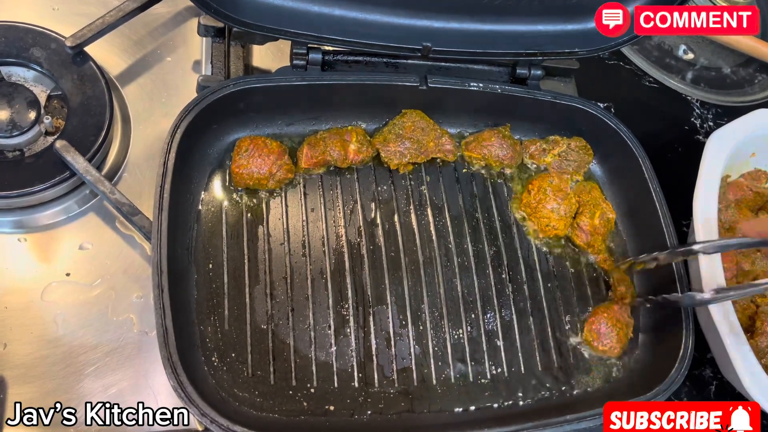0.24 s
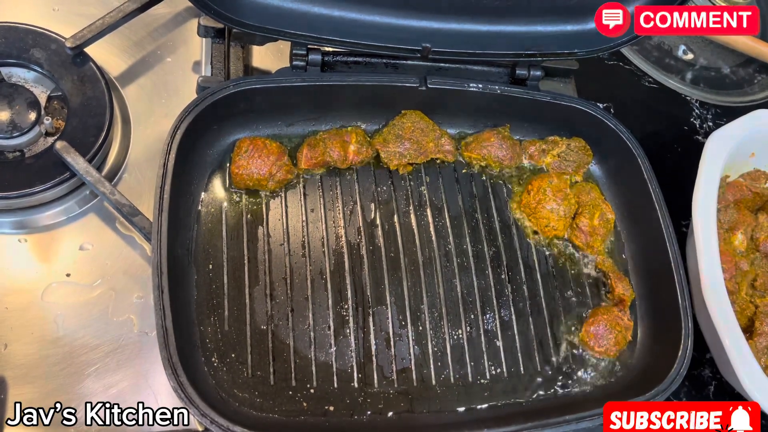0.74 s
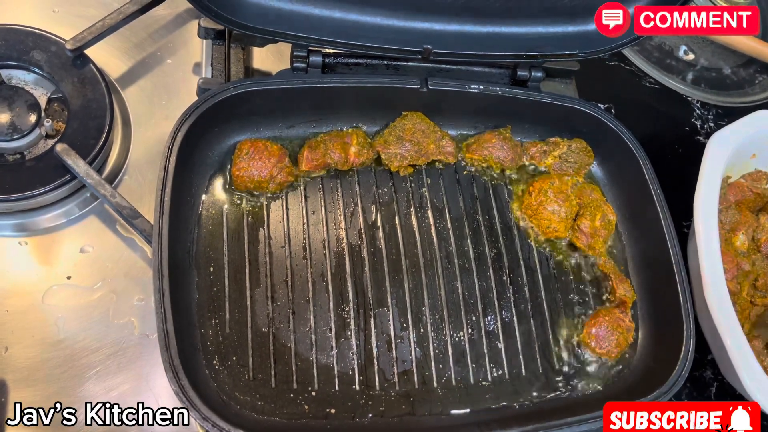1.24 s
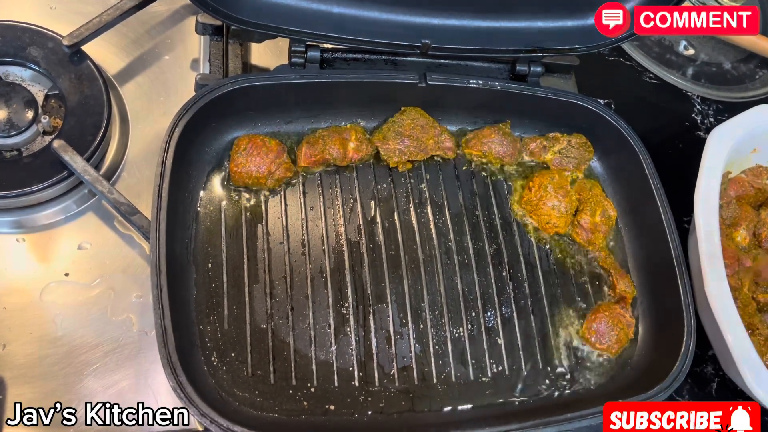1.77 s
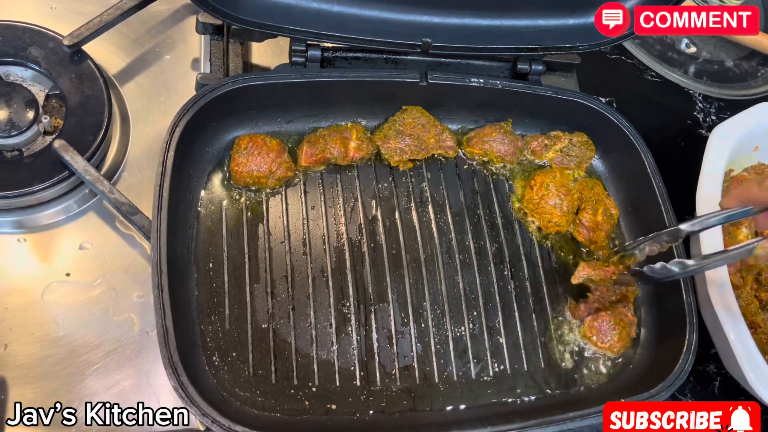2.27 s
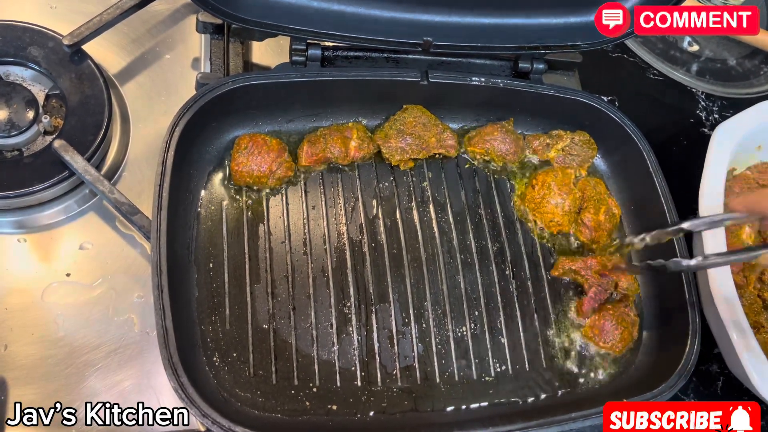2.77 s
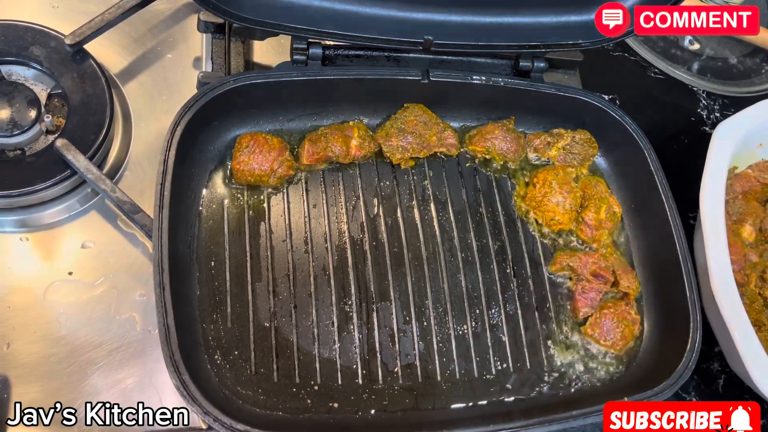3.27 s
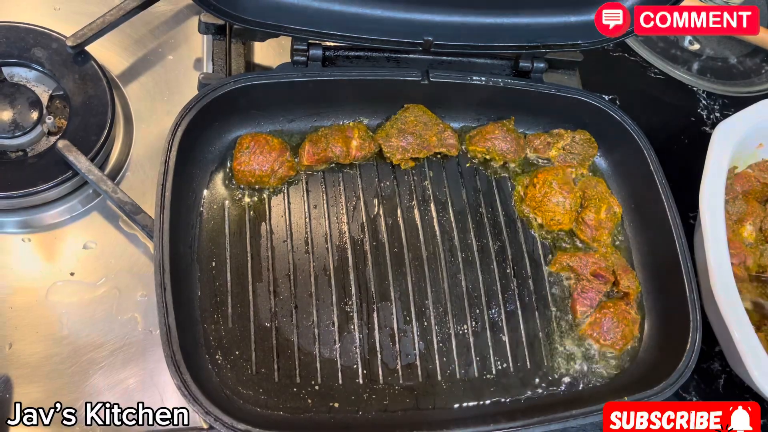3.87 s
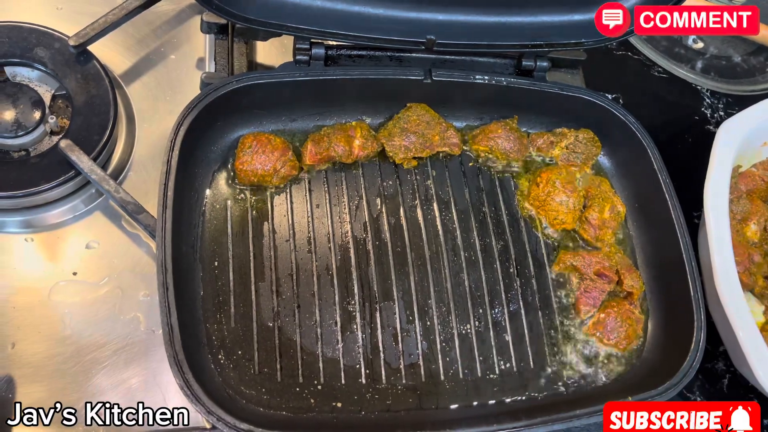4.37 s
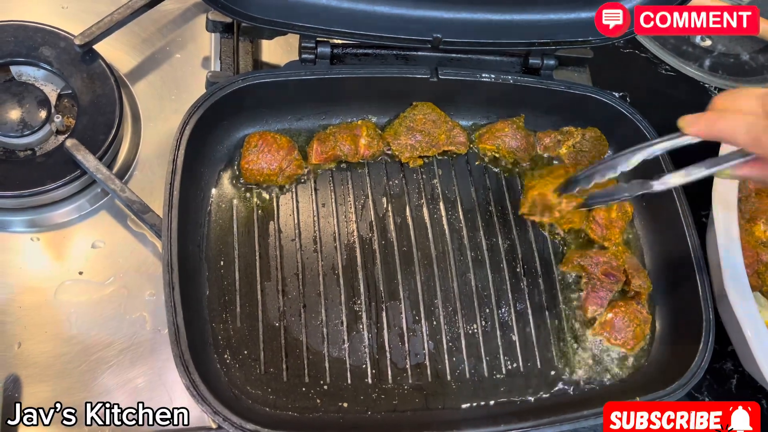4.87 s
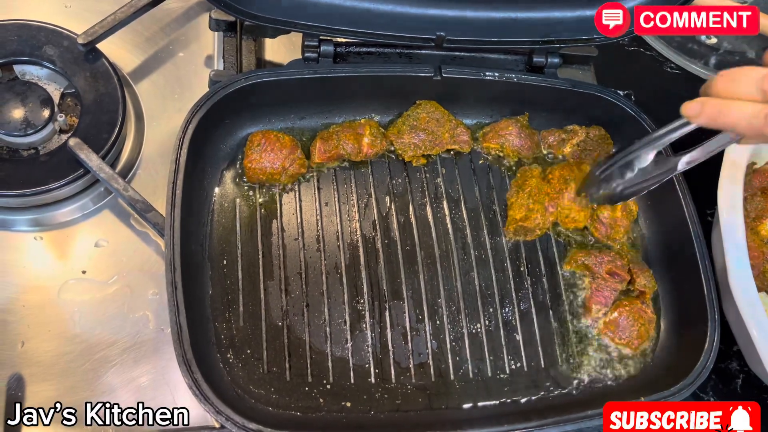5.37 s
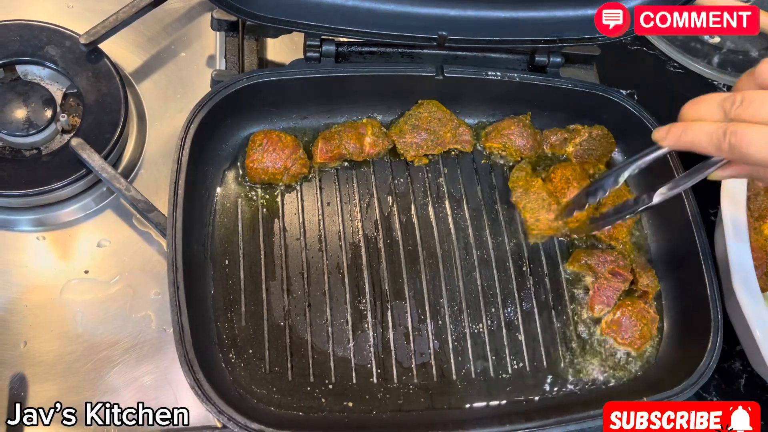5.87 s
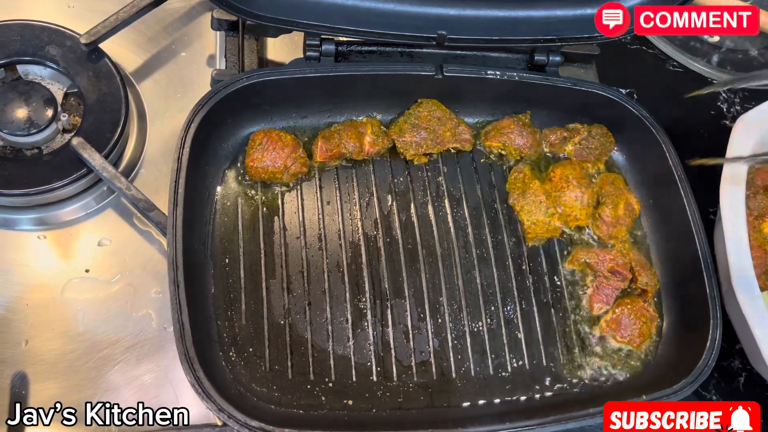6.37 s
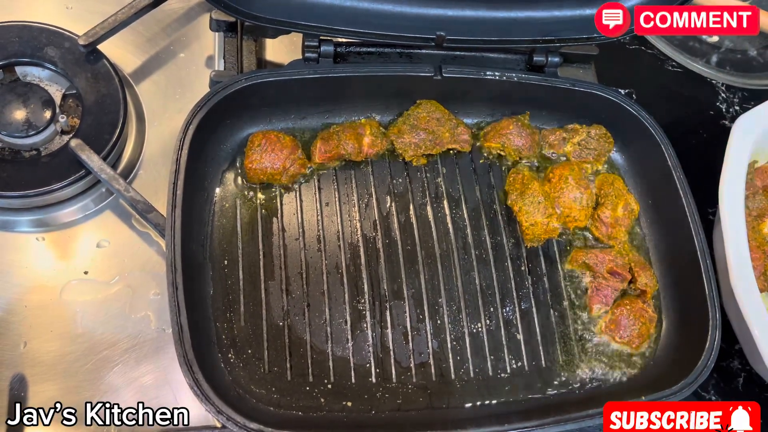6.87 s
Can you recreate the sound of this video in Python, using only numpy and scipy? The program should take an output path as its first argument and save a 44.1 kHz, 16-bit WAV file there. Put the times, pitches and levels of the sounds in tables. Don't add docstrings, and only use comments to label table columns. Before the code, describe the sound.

Meat pieces fry steadily in a ridged metal pan, fizzing and spitting sharply, with an early tong knock, faint squeaks and later scrapes.

```python
import sys
import numpy as np
from scipy import signal
from scipy.fft import rfft, irfft, next_fast_len
from scipy.io import wavfile
from scipy.ndimage import map_coordinates

SR = 44100
rng = np.random.default_rng(int(sys.argv[2]) if len(sys.argv) > 2 else 0)


def bounce(signal):
    frames = np.transpose(np.atleast_2d(signal))
    limited = np.clip(frames, -1, 1)
    pcm = np.round(limited * 32767).astype(np.int16)
    wavfile.write(sys.argv[1], SR, pcm)


def undo_db(level):
    steps = np.asarray(level, float) / 20
    return 10 ** steps


N = 314433


def unit(x):
    return x / np.sqrt(np.mean(x ** 2, axis=-1, keepdims=True) + 1e-20)


def along(points, hz):
    f, value = np.transpose(points)
    return np.interp(np.log(hz + 1), np.log(f + 1), value)


def wobble(rate):
    knots = rng.standard_normal(int(N * rate / SR) + 4)
    return map_coordinates(knots, [np.arange(N) * rate / SR])


def filtered(x, response):
    m = next_fast_len(N + 8192)
    return irfft(rfft(x, m) * response(np.fft.rfftfreq(m, 1 / SR)), m)[..., :N]


def bubbles(s, size, hz, life, rise, count=96):
    t = np.arange(count) / SR
    age = t / life[:, None]
    envelope = size[:, None] * age * np.exp(1 - age)
    wave = envelope * np.sin(2 * np.pi * hz[:, None] * t * (1 + rise * age))
    start = np.round(s * SR).astype(int)[:, None]
    at = np.clip(start + np.arange(count), 0, N)
    return np.bincount(at.ravel(), wave.ravel(), N + 1)[:N]


def ports(near, far):
    # f/Hz, likeness/0-1
    alike = [(200, .95), (800, .65), (1250, .2), (3000, .3), (6000, .32), (8200, .5), (9000, .85),
             (9800, .97), (10600, .97), (11000, .9), (11750, .9), (11950, .995), (12400, .97), (12900, .25),
             (14400, .05), (14800, .97)]
    # f/Hz, phase/rad
    lead = [(200, -.15), (1200, -1.2), (2750, -2.8), (3800, -5.9), (4800, -7.6), (5900, -12.5),
            (7200, -14.0), (8400, -12.3), (9750, -9.7), (10550, -9.15), (11600, -6.9), (11950, -6.283),
            (16000, -6.283)]
    # f/Hz, level/dB
    tilt = [(100, 3), (400, 1.5), (950, 3.5), (1700, 3), (2300, 0), (4000, 0.9), (5500, 1.5), (7000, 5.5),
            (8200, -0.4), (16000, 2)]
    side = np.array([[-.5], [.5]])
    like = lambda f: np.clip(along(alike, f), 0, 1)
    lean = lambda f: undo_db(-side * along(tilt, f))
    phase = lambda f: np.exp(1j * side * along(lead, f))
    direct = filtered(near, lambda f: lean(f) * np.sqrt(like(f)) * phase(f))
    return direct + filtered(far, lambda f: lean(f) * np.sqrt(1 - like(f)))


def kitchen():
    # f/Hz, level/dB
    rumble = [(28, -22), (45, -15), (75, 2), (110, -2.5), (160, -2), (220, -19.5), (400, -10.5),
              (700, -2.5), (1300, -74)]
    # f/Hz, rms level/dB
    mains = [(50, -58.5), (100, -70.5)]
    t = np.arange(N) / SR
    hum = np.zeros(N)
    for hz, db in mains:
        hum += np.sqrt(2) * undo_db(db + 1.4 * wobble(5.07)) * np.sin(2 * np.pi * hz * t)
    noise = rng.standard_normal((2, N))
    mid, side = unit(filtered(noise, lambda f: undo_db(along(rumble, f))))
    return hum + undo_db(-58.5) * (mid + undo_db(-9.5) * np.array([side, -side]))


def slips():
    # t/s, length/s, start f/Hz, end f/Hz, level/dB
    squeaks = [
        (2.875, .11, 790, 960, -48),
        (3.572, 0.074, 790, 894, -53),
    ]
    out, rough = np.zeros(N), undo_db(6.4 * wobble(120))
    for s, length, from_hz, to_hz, db in squeaks:
        u = np.clip((np.arange(N) / SR - s) / length, 0, 1)
        hz = from_hz + (to_hz - from_hz) * u + 25 * wobble(90)
        turn = 2 * np.pi * np.cumsum(hz) / SR
        out += undo_db(db) * np.sin(np.pi * u) * rough * (np.sin(turn) + 1.3 * np.sin(2 * turn))
    return out * undo_db([[1.2], [-1.2]])


def rubbing(hz):
    # t/s, length/s, level over the singing/dB
    rubs = [
        (2.55, .15, 5),
        (5.044, .5, 6.5),
        (5.624, 0.21, 11),
        (6.09, 0.13, 12),
    ]
    edge_s, centre_hz, reach_octaves = 0.047, 670, 0.5
    now = np.arange(N) / SR
    strokes = np.zeros(N)
    for s, length, db in rubs:
        strokes += db * np.clip(np.minimum(now - s, s + length - now) / edge_s, 0, 1)
    return strokes * np.exp(-(np.log2(hz / centre_hz) / reach_octaves) ** 2)


def pan():
    # t/s, peak level/dB
    knocks = [
        (0.16, -17),
        (2.692, -47),
        (5.693, -54),
        (6.141, -47),
    ]
    # f/Hz, knock level/dB, t60/s, singing level/dB, left-right level/dB
    modes = [(257, 1, 0.062, -70.5, 0), (342.1, -7, 0.26, -61, 1), (457, -24, 0.35, -65, 1),
             (684, -7.5, 0.1, -62.5, -1), (743, -20, 0.35, -82, 13), (960, 1, 0.093, -57.5, 11),
             (1162, -15, 0.055, -68.5, -18), (1412, -16, 0.1, -55.5, 2), (1504, -14, 0.093, -71, 0),
             (1765, -26, 0.036, -53.5, 2), (1964, -24, 0.18, -55, -2.5)]
    out, t = np.zeros((2, N + SR)), np.arange(SR // 2) / SR
    song = np.zeros((3, N))
    for hz, level_db, t60, sing_db, lean_db in modes:
        for s, db in knocks:
            envelope = undo_db(db + level_db - 60 * t / t60) * (1 - np.exp(-t * hz / 6.4))
            ring = envelope * np.sin(2 * np.pi * (hz * t + rng.random()))
            out[:, round(s * SR):][:, :len(t)] += ring * undo_db([[lean_db / 2], [-lean_db / 2]])
        wide = 1.0 / t60 + 0.025 * hz
        mode = lambda f: 1j * f * wide / (hz * hz - f * f + 1j * f * wide)
        song += undo_db(sing_db + rubbing(hz)) * unit(filtered(rng.standard_normal((3, N)), mode))
    thud_band = signal.butter(2, [160, 900], 'band', fs=SR, output='sos')
    for s, db in knocks:
        thud = signal.sosfilt(thud_band, rng.standard_normal((2, len(t))))
        envelope = undo_db(db + 2.5 - 60 * t / 0.21) * (1 - np.exp(-t / 0.017))
        out[:, round(s * SR):][:, :len(t)] += envelope * thud
    song *= undo_db(1.6 * wobble(6))
    return out[:, :N] + ports(song[0], song[1:])


def lesser(rule, count):
    mean, spread = np.reshape(rule, (-1, 2)).T
    s = rng.random(count) * N / SR
    return np.column_stack([s, mean + spread * rng.standard_normal((count, len(mean)))])


def spits():
    # t/s, peak level/dB, duller part level/dB
    clear_spits = [(0.2204, -20, -10), (0.375, -18, -15), (0.4344, -18, -15), (1.1573, -17, -17),
                   (1.5938, -17, -14), (1.6666, -16, -20), (1.8253, -17, -15), (1.925, -16, -14),
                   (2.2144, -12, -16), (2.2877, -18, -13), (2.4344, -16, -15), (2.7112, -17, -14),
                   (3.0235, -17, -13), (3.272, -16, -7), (3.3513, -17, -11), (3.5089, -13, -17),
                   (3.5907, -12, -18), (3.6955, -13, -20), (4.149, -13, -20), (4.5346, -18, -15),
                   (4.797, -15, -15), (5.44, -13, -16), (5.463, -16, -14), (6.0472, -16, -15),
                   (6.3041, -16, -14), (6.4522, -17, -13), (6.6074, -15, -17), (6.7092, -14, -11),
                   (6.8833, -17, -12), (7.0868, -11, -17)]
    # level/dB, spread/dB, duller part level/dB, spread/dB
    chance_spits = (-19, 1.5, -10, 3)
    s, db, dull_db = np.vstack([clear_spits, lesser(chance_spits, count=70)]).T
    u = rng.random((len(s), 2))
    bright_life, dull_life = .0002 + .0001 * u[:, 1], .00012 + .0001 * u[:, 0]
    crack = bubbles(s + .0004, undo_db(db + 2.4), 10900 + 800 * u[:, 0], bright_life, rise=.005)
    crack += bubbles(s + 0.00062, undo_db(db + dull_db + 9), 6000 + 2000 * u[:, 1], dull_life, rise=.01)
    return ports(crack, np.zeros((2, N)))


def pops():
    # t/s, peak level/dB, f/Hz, left-right level/dB
    clear_pops = [(0.2214, -23, 5760, 0), (0.277, -19.5, 4400, 0), (0.3657, -17.5, 4040, 8),
                  (0.7876, -23, 5260, 4), (0.8485, -20, 4520, 0), (0.8919, -19.5, 5200, 2.5),
                  (0.9534, -18.5, 5900, 3.5), (1.0066, -29, 5640, 7), (1.3349, -21, 6800, 9),
                  (1.3943, -23, 5780, 5), (1.4704, -18, 4700, 2.5), (1.517, -18, 4670, 4),
                  (2.5067, -22.5, 4690, 2.5), (2.5895, -21, 5100, 7), (2.832, -24.5, 5600, 11),
                  (3.0048, -13, 5230, 4), (3.3109, -16.5, 5900, 2.5), (3.3571, -18, 4240, -1),
                  (3.5004, -20.5, 5430, 3), (3.7853, -15, 5300, 2), (3.819, -20, 5400, 2.5),
                  (3.931, -21, 5700, 0), (4.5104, -17, 4300, 3.5), (4.7875, -16.5, 5600, 4),
                  (5.8316, -21, 5100, 5), (6.3869, -22, 6120, 2), (6.7356, -18, 5400, 6.5),
                  (6.8253, -18, 4940, 3), (7.0497, -21.5, 5600, -3), (7.086, -22, 7500, 5)]
    # level/dB, spread/dB, f/Hz, spread/Hz, left-right level/dB, spread/dB
    chance_pops = (-26.5, 1.5, 5700, 600, 2.5, 2.5)
    s, db, hz, pan_db = np.vstack([clear_pops, lesser(chance_pops, count=40)]).T
    life = 0.00068 * np.ones(len(s))
    ears = []
    for side in (.5, -.5):
        u = rng.random((len(s), 3))
        size = undo_db(db - 1 + side * pan_db)
        first = bubbles(s + 0.00037 + .00003 * u[:, 0], size, hz, life, rise=0.014, count=200)
        echo_s, echo_hz = s + .002 + .004 * u[:, 1], hz * (.93 + .14 * u[:, 2])
        echo = bubbles(echo_s, undo_db(-5) * size, echo_hz, 1.6 * life, rise=.01, count=200)
        ears.append(first + echo)
    return np.array(ears)


def by_size(size):
    sizes = (0, .5, 1)
    return np.exp(-((np.array(sizes)[:, None] - size) / 0.32) ** 2)


def boiling():
    # t/s, level/dB
    simmer = [(0, -1), (.08, -0.5), (.7, 1), (.9, .5), (1.2, -0.5), (1.5, .5), (1.68, -0.5), (1.8, 0),
              (2.22, -1), (2.5, 1), (3.3, -0.5), (3.65, 0.5), (3.8, 1.5), (4.02, 0.5), (4.5, 0), (5.6, 2),
              (6.8, -0.5), (7.13, 0.5)]
    follow = (0.18, .99, 0.77)
    # t/s, flare level/dB, share in small bubbles/0-1
    laid = [
        (.17, 1.5, .4),
        (2.62, 1, 0),
        (2.84, 3.5, .1),
        (5.045, 4.5, 0.8),
        (5.17, 5, 0.53),
    ]
    flare_fall_s = (.2, 0.16, 0.85)
    # t/s, level/dB, bubble size/0 large-1 small
    flurries = [(.28, 5.5, 0.35), (.34, -0.5, .1), (.4, -6, .95), (.71, -6, 0.75), (1.45, 5, 0.75),
                (2.22, 4.5, 0.87), (2.25, -8, 0.78), (2.3, 4, .95), (2.7, 5.5, .05), (2.72, 1, 0.93),
                (2.98, -4, 0.45), (3.02, 5, .3), (3.06, -4, 0.39), (3.14, 4, 0.67), (3.26, 4.5, 0.41),
                (3.29, 4, .95), (3.33, -1.5, .95), (3.37, 4.5, 0.26), (3.45, -4, 0.78), (3.5, 3.5, 0.67),
                (3.99, 4, .95), (4.01, -7, 0.84), (4.47, 3.5, 0.82), (4.51, -1, .95), (5.08, 1, 1),
                (6.39, 3, 0.24), (6.62, 1, 1)]
    rise_s, hold_s, flurry_s = 0.045, 0.089, 0.022
    t = np.arange(N) / SR
    db = np.outer(follow, np.interp(t, *np.transpose(simmer)))
    for s, flare_db, small in laid:
        rise = 1 - np.exp(-np.clip(t - s, 0, None) / rise_s)
        fall = np.exp(-np.clip(t - s - hold_s, 0, None) / np.array(flare_fall_s)[:, None])
        db += flare_db * np.array([[1 - small], [.65], [small]]) * rise * fall
    for s, gush_db, size in flurries:
        db += gush_db * by_size(size) * np.exp(-((t - s) / flurry_s) ** 2)
    return undo_db(db)


def spray(surge, lo_hz, hi_hz, life, spread_db, hiss, count):
    chance = np.cumsum(surge ** 2)
    streams = []
    for _ in range(3):
        u = rng.random((count, 4))
        s = np.interp(u[:, 0], chance / chance[-1], np.arange(N) / SR)
        size = undo_db(-spread_db * np.log(u[:, 1] + 1 / 300)) * np.sign(u[:, 3] - .5)
        hz = lo_hz + (hi_hz - lo_hz) * u[:, 2]
        streams.append(bubbles(s, size, hz, life * (.5 + u[:, 3]), rise=0.039))
    band = lambda f: 1 / np.sqrt((1 + (lo_hz / (f + 1)) ** 16) * (1 + (f / hi_hz) ** 16))
    fine = filtered(surge * rng.standard_normal((3, N)), band)
    share = np.clip(hiss, 0, 1)
    return unit(np.sqrt(1 - share) * unit(np.array(streams)) + np.sqrt(share) * unit(fine))


def sizzle():
    # f/Hz, spectrum level/dB per Hz
    colour = [(150, -30), (500, -25), (1200, -18.5), (2500, -12.5), (4000, -11.5), (5500, -5), (7000, -9.5),
              (8400, -10.5), (9100, -3.5), (11000, 0.5), (11800, -4), (13300, -19), (14500, -13),
              (16000, -22)]
    large, middle, small = boiling()
    throb = .4 * wobble(25) + .7 * wobble(90)
    large_surge = undo_db(.4 * throb)
    middle_surge = undo_db(.7 * throb + .9 * wobble(45))
    small_surge = undo_db(.7 * throb + 1.1 * wobble(120))
    large = large * spray(large_surge, 133, 3300, 0.00088, 2.25, hiss=0.66, count=6000)
    middle = middle * spray(middle_surge, 2890, 8850, 0.00025, 2.74, hiss=0.32, count=12000)
    small = small * spray(small_surge, 7630, 17300, 0.00018, 2.4, hiss=0.5, count=14000)
    widths = np.sqrt([3000, 5200, 8200])
    flat = widths[0] * large + widths[1] * middle + widths[2] * small
    fry = undo_db(-60.5) * filtered(flat, lambda f: undo_db(along(colour, f)))
    return ports(fry[0], fry[1:])


def scene():
    return kitchen() + slips() + pan() + spits() + pops() + sizzle()


def band_limit(x):
    return signal.sosfilt(signal.butter(12, 16860, fs=SR, output="sos"), x)


def record(dry):
    mix = filtered(dry, lambda f: f < 15750)
    return band_limit(mix)


dry = scene()
out = record(dry)
bounce(out)
```